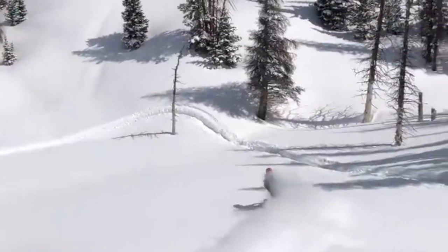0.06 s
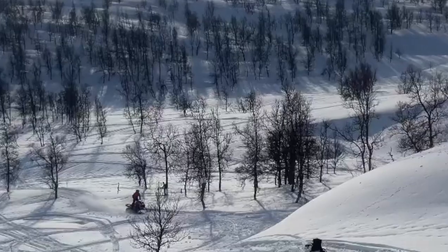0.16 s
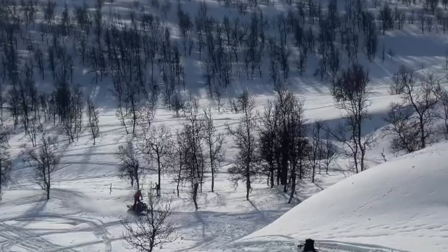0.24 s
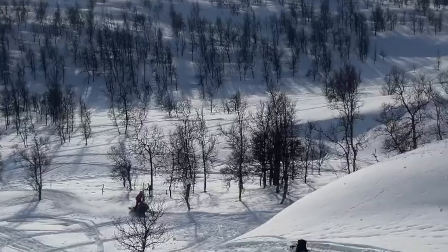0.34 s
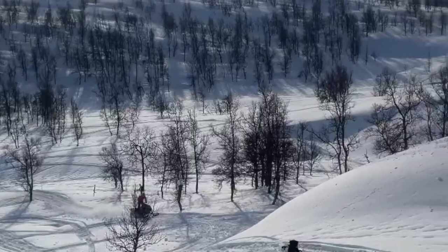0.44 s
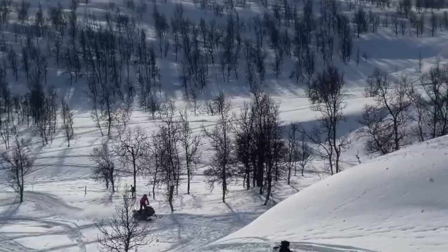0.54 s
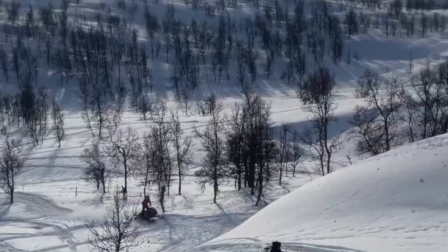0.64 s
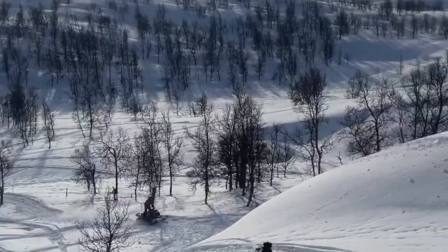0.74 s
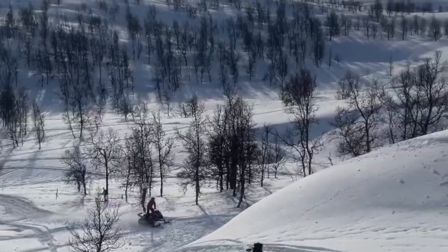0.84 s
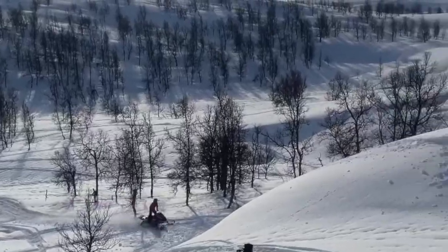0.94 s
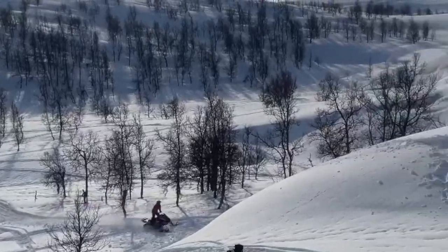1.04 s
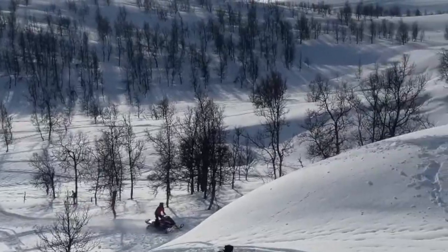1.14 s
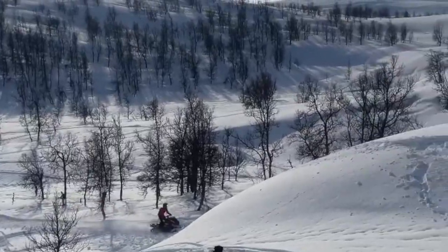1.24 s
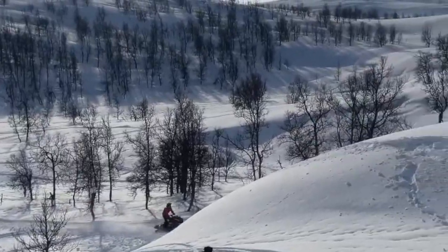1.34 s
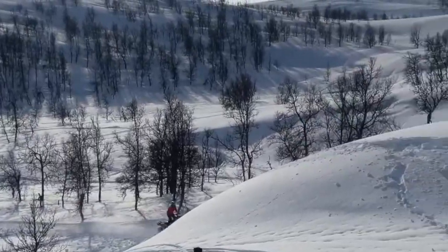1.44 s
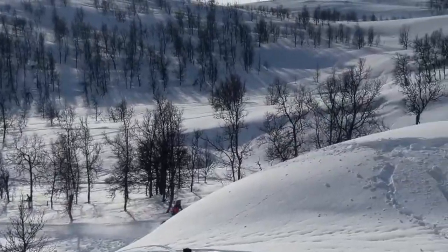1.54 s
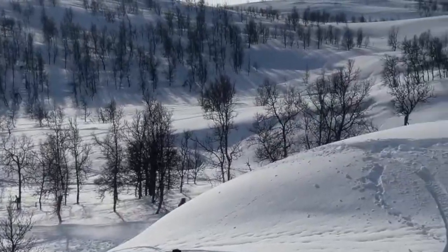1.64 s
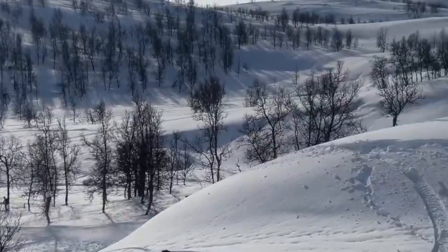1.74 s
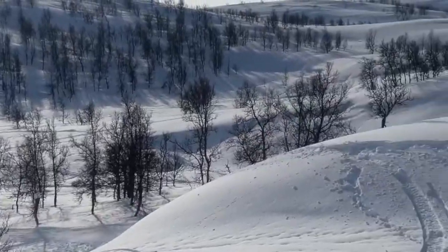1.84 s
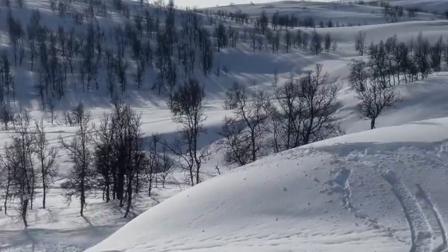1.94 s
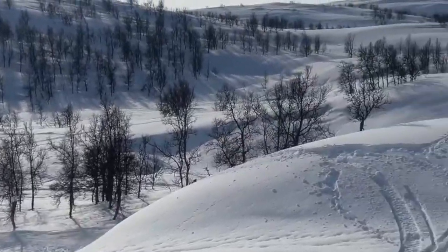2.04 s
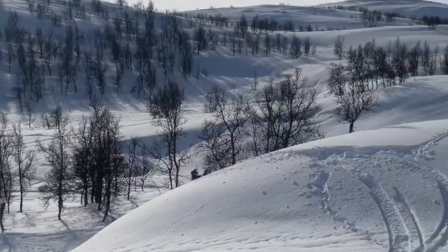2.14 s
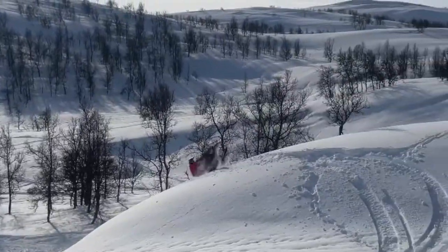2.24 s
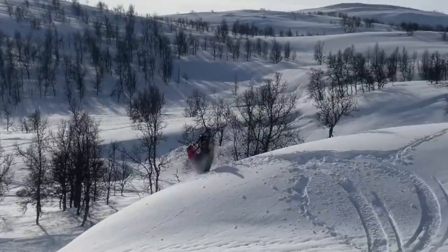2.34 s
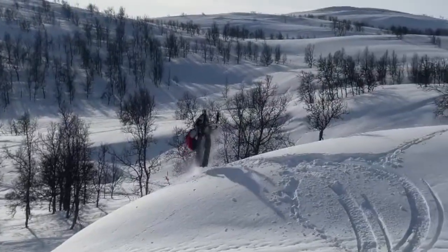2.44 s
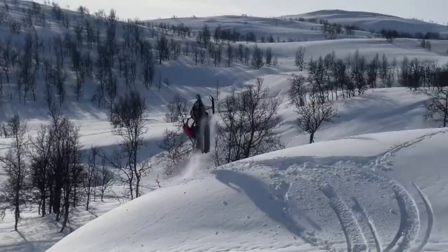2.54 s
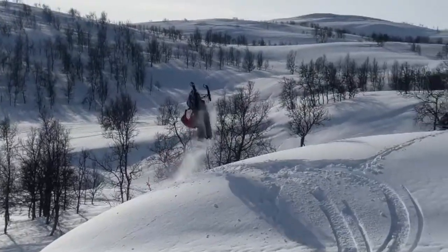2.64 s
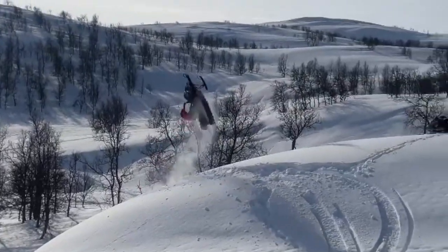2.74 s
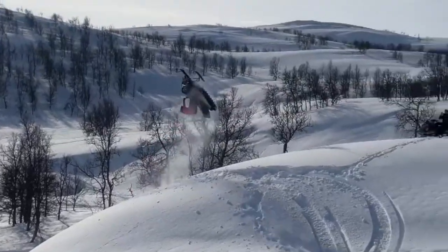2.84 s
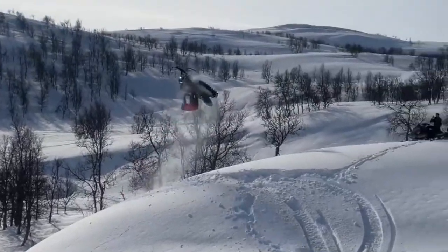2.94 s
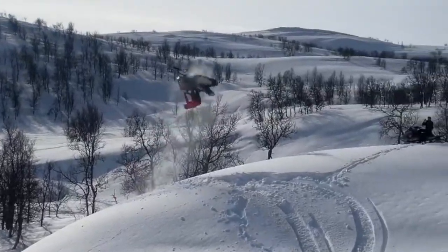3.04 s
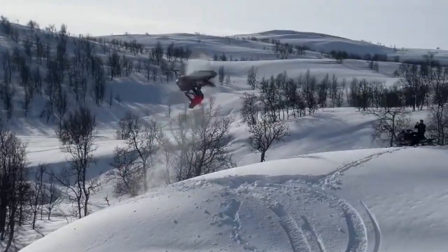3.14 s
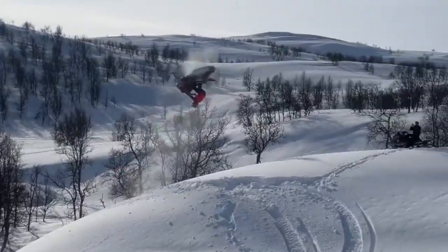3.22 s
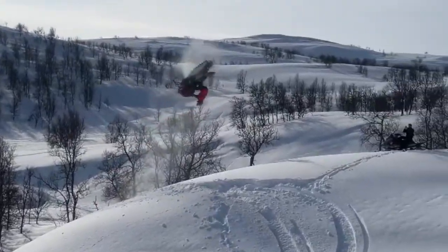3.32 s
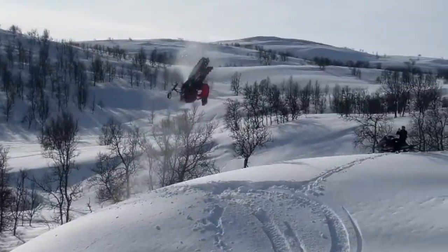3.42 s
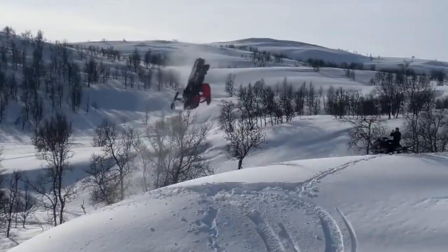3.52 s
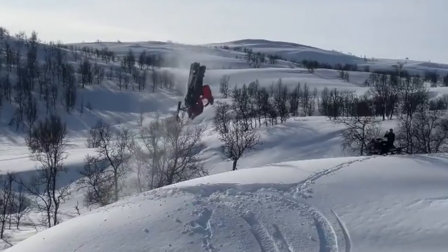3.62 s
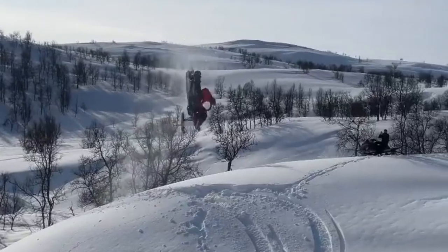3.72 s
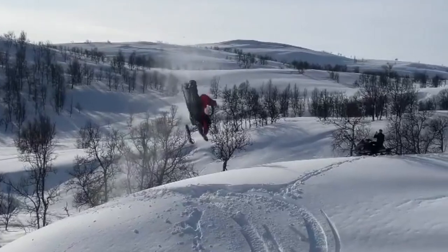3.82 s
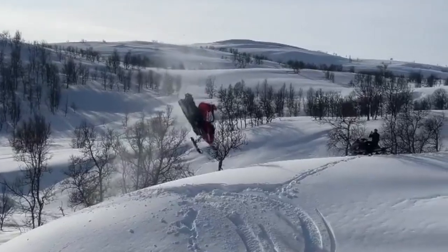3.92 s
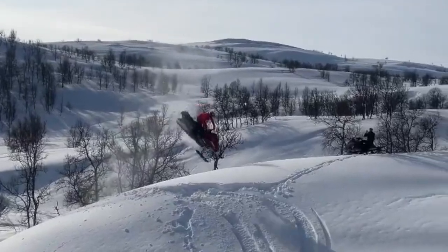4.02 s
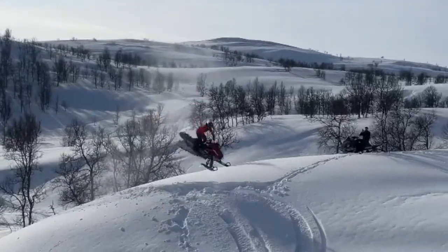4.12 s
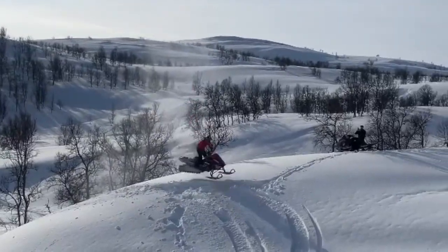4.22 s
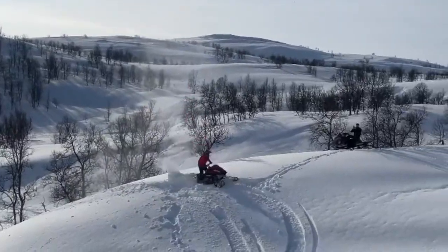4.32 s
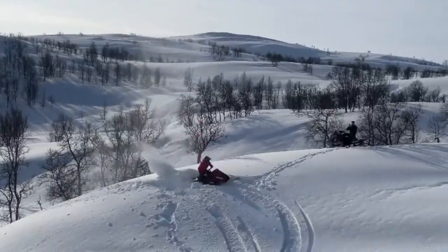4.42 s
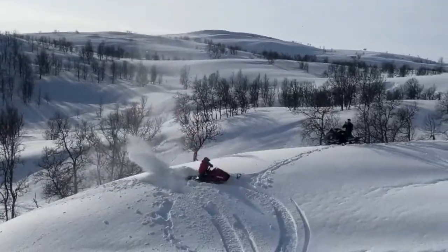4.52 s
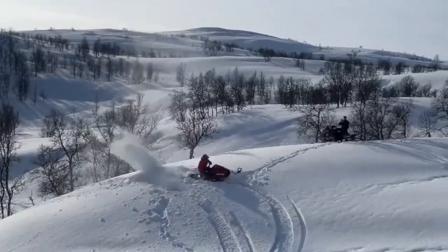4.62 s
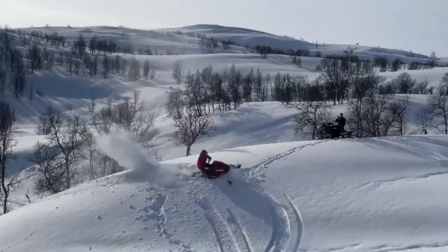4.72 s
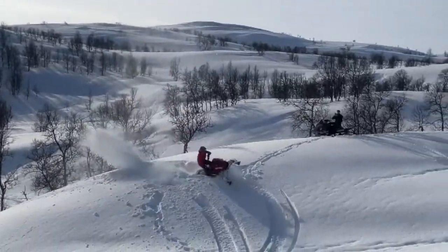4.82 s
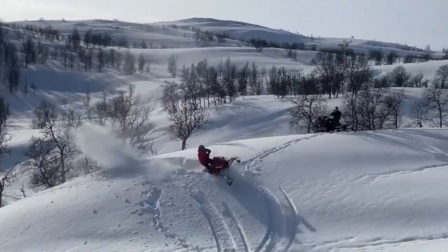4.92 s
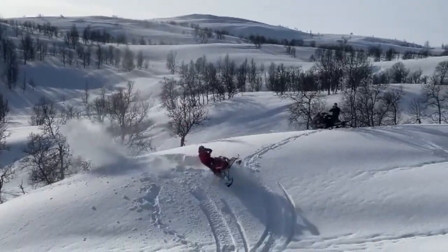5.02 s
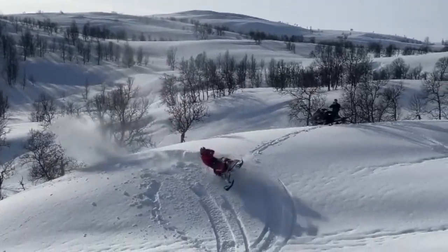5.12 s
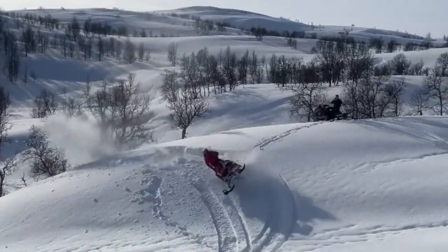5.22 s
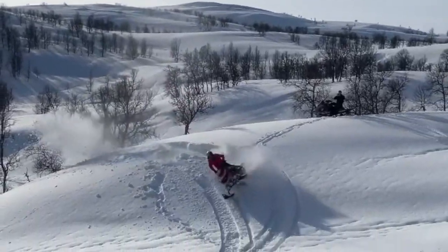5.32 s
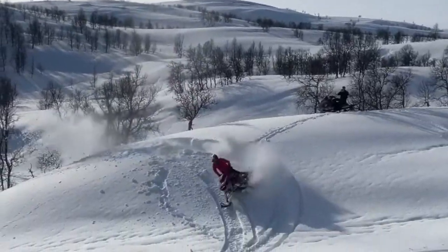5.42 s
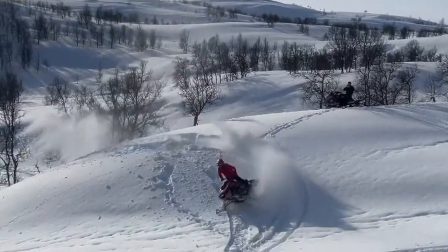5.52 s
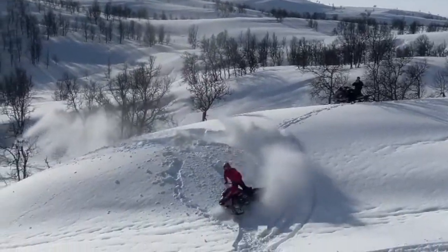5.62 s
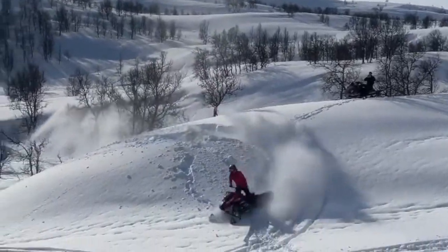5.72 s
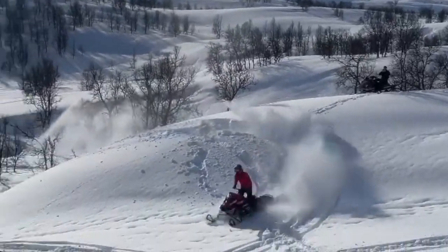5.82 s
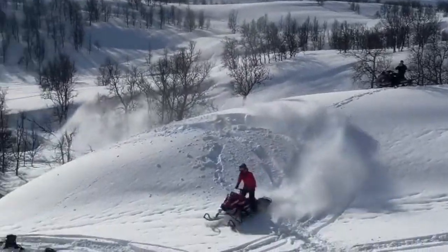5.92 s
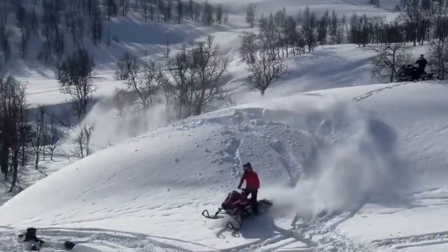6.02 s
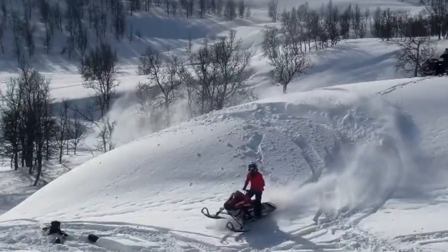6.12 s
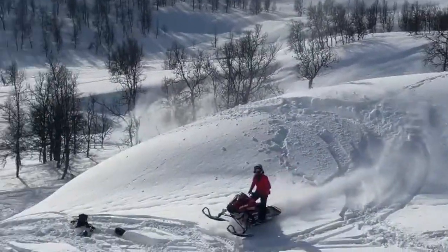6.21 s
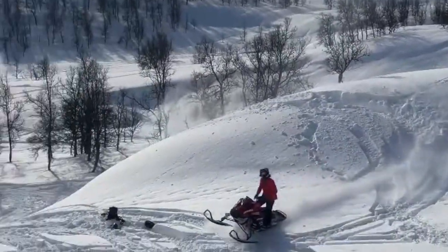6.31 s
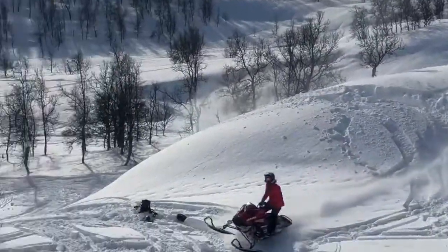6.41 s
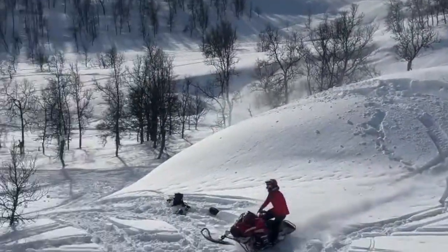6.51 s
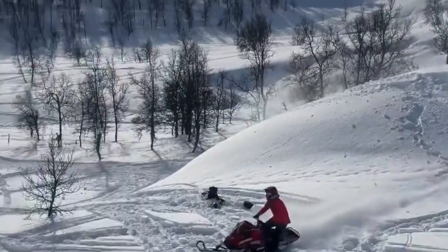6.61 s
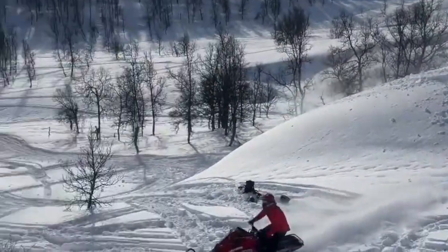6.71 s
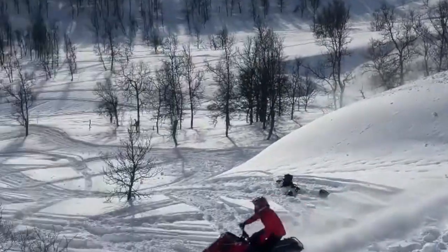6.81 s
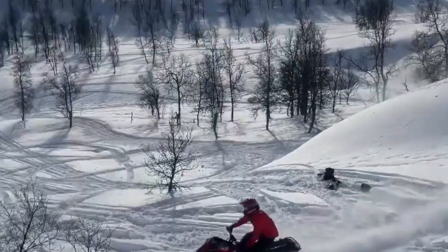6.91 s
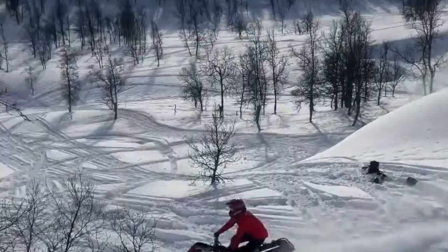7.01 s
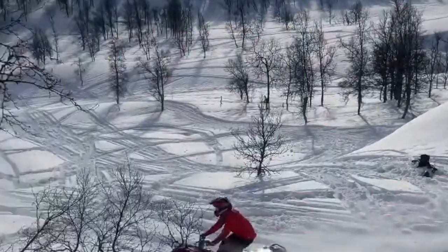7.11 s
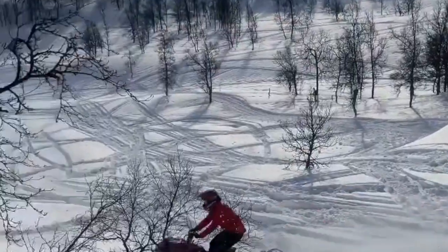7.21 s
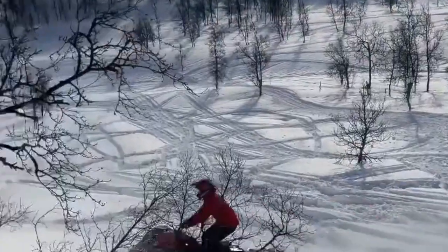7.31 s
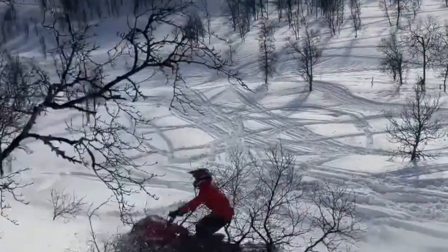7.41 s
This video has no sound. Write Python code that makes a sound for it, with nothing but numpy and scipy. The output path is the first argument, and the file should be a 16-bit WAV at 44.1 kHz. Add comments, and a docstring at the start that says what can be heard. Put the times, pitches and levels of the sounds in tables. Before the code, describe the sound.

A distant snowmobile blips its throttle, revs hard over a jump, lands in snow and rides past close by, its buzzing pitch finally sinking.

```python
"""A snow hill among wooded slopes, heard from one stereo microphone in light wind.
A two-stroke snowmobile blips its throttle far off, climbs, flips through the air, lands and rides past
close by. Firings sound the tuned pipe, gas rasps with them, and the rubber track whirs at its own speed
and throws snow. A split second of another sled, close up, and a short silence come first."""
import sys
import numpy as np
from scipy import signal
from scipy.fft import rfft, irfft, next_fast_len
from scipy.io import wavfile
from scipy.ndimage import uniform_filter1d

SR = 44100
rng = np.random.default_rng(int(sys.argv[2]) if len(sys.argv) > 2 else 0)


def file_out(sig):
    """Save sig as 16-bit WAV at sys.argv[1]."""
    # one column per channel
    cols = np.atleast_2d(sig).T
    # limit, then scale
    lim = np.clip(cols, -1, 1)
    pcm = np.round(lim * 32767).astype(np.int16)
    wavfile.write(sys.argv[1], SR, pcm)


N = 328913
T = np.arange(N) / SR
START_S = .154  # the distant sled comes in
FADING_DB, JITTER_TURNS = 2.6, .007  # random fading of each overtone; unevenness of the firings

# The pipe blares as it comes into tune and just before the throttle is cut.
# Each row: centre and half width in seconds, extra bark in dB, extra gas noise in dB.
SURGES = [(.36, 0.069, 3, -2), (1.34, 0.045, 2, 1), (2.36, 0.042, 1.5, -1.5), (2.785, 0.031, 5, 0),
          (5.99, 0.087, 1.5, -2.5), (6.562, 0.03, 6, -1.5)]

def engine(clean_rasp_db=-5, rough_rasp_db=3):
    """Pipe, intake and exhaust; returns their sound, the running count of firings and the bark's level."""
    hz = revs()
    drone_db, octave_db, bark_db, snarl_db = (loudness(voice, hz) for voice in VOICES)
    detuned = collapse()
    octave_db = octave_db - 16 * detuned
    bark_db = bark_db - 5.5 * detuned
    rasp_db = clean_rasp_db + roughness(hz, throttle()[0]) * (rough_rasp_db - clean_rasp_db)
    rasp_db = rasp_db + np.dot((-5.5, -1.5, -3, 0), sides()) + 7 * detuned
    flutter = .11 + .17 * roughness(hz, 1)  # steadier at high revs, even with the throttle shut
    turns = np.cumsum(hz * (1 + .002796 * walk(35))) / SR
    turns = turns + .017 * flutter * per_firing(turns)  # each firing comes a little early or late
    throb_db = np.dot((1.2, 2.2, .54, .89), sides()) * walk(22)  # deepest while the sled tumbles
    burble_db = 1.9 * airborne() * walk(34)  # in the air the bark and octave waver at random
    surge_db, surge_rasp_db = bumps(SURGES)
    sled = drone(turns, drone_db + throb_db, octave_db + burble_db, flutter) + intake(turns)
    sled = sled + exhaust(turns, hz, bark_db + surge_db + burble_db, snarl_db, rasp_db + surge_rasp_db)
    return sled, turns, bark_db

# Throttle blips, far off and in mid-air. Each row: times of opening, top speed and shutting in seconds,
# top firing rate in Hz, push in dB.
BLIPS = [(0.21, 0.358, 0.42, 261.2, -2), (.635, 0.71, 0.77, 225.7, -3), (0.849, 1.039, 1.125, 233.1, -2),
         (1.18, 1.334, 1.35, 228, -1.5), (1.508, 1.663, 1.69, 239.3, -2), (1.829, 2.131, 2.24, 253.2, 0),
         (3.628, 3.95, 4.07, 265.1, -3.5)]
# Long pulls: uphill, through the flip, into the landing, round the turn, past the microphone.
# Each row: times of opening and shutting in seconds, push in dB.
PULLS = [(2.098, 2.811, -0.5), (2.801, 3.503, -0.5), (4.13, 4.374, -0.5), (4.55, 5.651, 1.7),
         (5.835, 6.574, 2.5)]
SNAP_S = .007  # a long pull ends this abruptly

def throttle(open_s=.12, ease_s=.017):
    """How far the throttle is open (0-1), and its push in dB; blips ease off, long pulls snap shut."""
    opening, push_db = 0, 0
    blips = [(opens, shuts, db, ease_s) for opens, _, shuts, _, db in BLIPS]
    pulls = [(*pull, SNAP_S) for pull in PULLS]
    for opens, shuts, db, closing_s in blips + pulls:
        gate = np.clip((T - opens) / open_s, 0, 1) * np.clip(1 - (T - shuts) / closing_s, 0, 1)
        opening, push_db = opening + gate, push_db + db * gate
    return np.minimum(opening, 1), push_db

# Up the hill and into the flip. Each row: time in seconds, firing rate in Hz.
CLIMB = [(2.23, 259.5), (2.33, 259.1), (2.422, 279), (2.515, 284.3), (2.78, 274.7), (2.89, 249.3),
         (2.99, 251.6), (3.14, 249), (3.42, 268.2), (3.49, 271.1)]
# From the landing to coasting past the microphone. Each row: time in seconds, firing rate in Hz.
RIDE_BACK = [(4.12, 248.4), (4.189, 236.8), (4.341, 248.6), (4.4, 214.2), (4.459, 195.2), (4.53, 206.2),
             (4.72, 256.3), (4.85, 280.5), (5.35, 281.3), (5.62, 269.4), (5.79, 265.5), (6.12, 286.5),
             (6.56, 282.8), (6.67, 235.7), (6.72, 207.9), (6.751, 203.1), (7.11, 176), (7.409, 135.4),
             (7.45, 135.7)]

def revs(start_hz=222, fall_hz_per_s=205):
    """Firing rate in Hz: it sinks ahead of each blip, winds up again, and follows the long pulls."""
    points = [(START_S, start_hz), *map(tuple, CLIMB), *map(tuple, RIDE_BACK)]
    for opens, reached, shuts, top_hz, _ in BLIPS:
        last_s, last_hz = max(p for p in points if p[0] < opens)
        low_hz = last_hz - fall_hz_per_s * (opens - last_s)
        points += [(opens, low_hz), (reached, top_hz), (shuts, top_hz)]
    return uniform_filter1d(curves(sorted(points))[0], size=1300)  # the flywheel rounds the corners

def roughness(hz, opening, off_pipe_hz=221, on_pipe_hz=283):
    """0 with the throttle open and the pipe in tune, 1 with it shut or at low revs; rougher in the air."""
    in_tune = np.clip((hz - off_pipe_hz) / (on_pipe_hz - off_pipe_hz), 0, 1)
    return np.minimum(1 - opening * in_tune + .1 * airborne(), 1)

def airborne(from_s=2.82, to_s=4.7):
    """1 from take-off until just after the landing, while the engine spins without load."""
    return uniform_filter1d(((T > from_s) & (T < to_s)) * 1., size=2200)

def collapse(recovery_s=.33):
    """0-1: when the last pull is cut, the pipe drops out of tune at once and recovers slowly."""
    age = np.maximum(T - PULLS[-1][1], 0)
    return np.minimum(age / SNAP_S, 1) * np.exp(-age / recovery_s)

# The pipe's low tones swell and fade apart from the rest.
# Each row: centre and half width in seconds, gain of the drone in dB, gain of its octave in dB.
SWELLS = [(.37, 0.12, 0.5, 2), (.52, 0.058, 4.5, 11), (2.421, 0.071, 4, 2), (2.55, 0.037, -8, -7.5),
          (2.66, 0.047, -2.5, 3.5), (3.151, 0.035, 6, 2), (3.4, 0.14, 2.5, -8), (3.57, 0.053, -9, -0.5),
          (4.09, 0.062, -10, -12.5), (4.26, 0.099, 7, 4.5), (4.41, 0.041, 2, -15),
          (4.661, 0.19, -7.5, -6.5), (5.26, 0.073, 1, -6.5), (5.74, 0.18, 3.5, -5.5),
          (6.38, 0.16, -7.5, 1.5), (6.61, 0.048, 11, -4), (6.71, .035, 5, -1), (6.98, .2, -5, 5.5)]

def drone(turns, drone_db, octave_db, flutter):
    """The tuned pipe's two lowest tones; uneven firings make them flutter."""
    swell_db, octave_swell_db = bumps(SWELLS)
    low = undb(drone_db + swell_db) * np.cos(2 * np.pi * turns) * (1 + flutter * walk(70))
    octave = undb(octave_db + octave_swell_db) * np.sin(4 * np.pi * turns)
    return np.sqrt(2) * (low + octave * (1 + .82 * flutter * walk(70)))

# Exhaust gas noise. Each row: frequency in Hz, relative level in dB.
RASP = [(40, -50.5), (85, -38), (130, -22), (220, 6.5), (330, -0.5), (450, 0), (700, 0.5), (1000, 1.5),
        (1250, -3.5), (1600, 0.5), (2000, -4.5), (2250, -3.5), (2750, -16.5), (3080, -15), (4500, -23.5)]

def exhaust(turns, hz, bark_db, snarl_db, rasp_db):
    """Overtones and rasping gas leave the pipe as a low body, a bark in the middle and a snarl on top."""
    pipe = overtones(turns, hz) + undb(rasp_db) * gas(turns, RASP, depth=.076, flicker_db=1.27)
    snarl = highpass(pipe, 1900, order=6)
    body = pipe - highpass(pipe, 600, order=4)
    bark = pipe - snarl - body
    body = undb(2) * body / np.sqrt(1 + undb(2 * rasp_db))
    return undb(bark_db - 1) * (steady(bark) + body) + undb(snarl_db - 1.5) * steady(snarl)

# The exhaust from the microphone's spot: far off, side-on in the jump, coming downhill, passing close.
# Each row: frequency in Hz, relative level in dB.
BARK_FAR = [(600, -6), (790, -4.5), (920, -2), (1120, -8), (1300, -8.5), (1580, -11.5), (2000, -9.5),
            (2250, -11.5), (2500, -14.5), (2850, -25), (3400, -23), (4500, -68)]
BARK_JUMP = [(600, -1), (800, 3.5), (1080, -1), (1380, -8.5), (1700, -8.5), (1980, -10.5), (2260, -5),
             (2530, -16.5), (2790, -9), (3100, -21.5), (3400, -37), (4500, -39), (6000, -42)]
BARK_RETURN = [(600, -1), (830, 5), (1120, 3.5), (1400, -0.5), (1680, -5.5), (1960, -5.5), (2250, -8),
               (2530, -11), (2800, -19.5), (3100, -16.5), (3400, -25.5), (3700, -19.5), (5400, -40.5)]
BARK_PASS = [(600, -1), (850, 9.5), (1140, 1), (1420, 4), (1710, 2), (2000, -5.5), (2280, -2.5),
             (2560, -4.5), (2850, -8.5), (3140, -10.5), (3400, -24), (4280, -21.5), (5700, -32)]
# Single overtones stand out or sink as the sled turns.
# Each row: start and end in seconds, multiple of the firing rate, gain in dB.
RINGS = [(1.26, 1.42, 3, -4), (1.28, 1.4, 11, 7), (2.38, 2.55, 9, 5), (2.3, 2.56, 10, -4),
         (2.58, 2.82, 10, 7), (2.34, 2.6, 8, 4), (2.64, 2.86, 8, -7), (2.95, 3.52, 4, 4),
         (3.28, 3.52, 3, -4), (3.28, 3.52, 5, 7), (3.28, 3.52, 6, 3), (3.28, 3.52, 11, -6),
         (3.28, 3.52, 9, -3), (3.77, 4.0, 11, 7), (4.18, 4.33, 10, 6), (4.2, 4.38, 9, 5),
         (4.56, 4.71, 4, 6), (4.85, 5.15, 9, 9), (4.86, 5.16, 7, 3), (5.17, 5.43, 8, 9), (5.15, 5.47, 9, 7),
         (5.8, 6.02, 11, -6), (6.03, 6.45, 9, 6), (6.1, 6.35, 11, 3), (6.5, 6.62, 4, 7)]

def overtones(turns, hz, flicker_db=1.47):
    """Tones of the exhaust pulses; unequal cylinders add half orders, snow reflections make each fade."""
    shares, spectra = sides(), (BARK_FAR, BARK_JUMP, BARK_RETURN, BARK_PASS)
    imbalance_db = np.dot((-7.5, -16, -11.5, -11.5), shares)
    turns = turns + JITTER_TURNS * walk(90)  # uneven running smears the highest tones most
    tones = 0
    for order in np.r_[2.5:12:.5, 12:21]:
        db = sum(share * at(spectrum, order * hz) for share, spectrum in zip(shares, spectra))
        ring_db = sum(gain * during(start, end) for start, end, k, gain in RINGS if k == order)
        db = db + (order % 1 > 0) * imbalance_db + ring_db + FADING_DB * walk(16)
        tones = tones + undb(db) * np.cos(2 * np.pi * (order * turns + rng.random()))
    return steady(tones) * undb(flicker_db * per_firing(turns))

# The airbox's growl. Each row: frequency in Hz, relative level in dB.
GROWL = [(40, -43.5), (88, -32), (124, -0.5), (150, -2.5), (200, 0.5), (350, -5.5), (600, -7.5),
         (2000, -49)]
# Its strength along the ride. Each row: time in seconds, level in dB.
LOAD = [(.15, -54), (.42, -56), (.5, -35.5), (.62, -44), (1.9, -49), (2.25, -45), (2.5, -35.5), (2.85, -22),
        (3.1, -31.5), (4.25, -29.5), (4.55, -52), (5.2, -35), (6.45, -42), (6.7, -31.5), (6.85, -36.5),
        (7.45, -47.5)]

def intake(turns):
    """The airbox gulps once every two firings and growls under load."""
    return gas(turns / 2, GROWL, depth=1, flicker_db=.5) * undb(curves(LOAD)[0])

# How the sled faces the microphone.
# Each row: time in seconds, side (0 far off, 1 side-on in the jump, 2 coming downhill, 3 passing close).
FACING = [(1.8, 0), (2.3, 1), (4.4, 1), (4.7, 2), (5.6, 2), (5.95, 3)]

def sides():
    """Shares of the four sides the sled shows; they blend settings listed as far, jump, return, pass."""
    facing = curves(FACING)[0]
    return np.array([np.maximum(1 - abs(facing - k), 0) for k in range(4)])

# Distance from the microphone and the lie of the land. Each row: time in seconds, gain in dB.
NEARNESS = [(.15, -9.5), (1.4, -11), (2.3, 4.5), (2.5, 3.9), (3.4, 3), (4.3, 0.7), (4.5, -4), (5.5, 7),
            (6.1, 0.17), (7.45, 1)]
# Drone, octave, bark and snarl. Each row, in dB: base level far off, in the jump, returning and passing,
# then the change with the throttle shut, behind the hill, and per octave of revs.
VOICES = {"drone": (-19.5, -19.5, -24, -25, -4, -16, 14),
          "octave": (-25.5, -23, -26, -21.5, -9.5, -27.5, 10),
          "bark": (-19.5, -24, -30, -26.5, -5.5, -28.5, 6),
          "snarl": (-28, -31.5, -34.5, -29.5, -8.5, -27, 7)}

def loudness(voice, hz):
    """Level of one engine voice in dB, from distance, side shown, throttle, hill and revs."""
    *side_db, shut_db, hidden_db, per_octave_db = VOICES[voice]
    opening, push_db = throttle()
    behind_hill = np.interp(T, (1.416, 1.96, 2.16, 2.347), (0, 1, 1, 0))
    effort_db = push_db + shut_db * (1 - opening) + per_octave_db * np.log2(hz / 270)
    return curves(NEARNESS)[0] + np.dot(side_db, sides()) + hidden_db * behind_hill + effort_db

# The rubber track along the ride. Each row: time in seconds, lug rate in Hz, level in dB.
TRACK = [(.15, 238, -45.5), (1.4, 205, -47.5), (2.3, 139.1, -49), (2.55, 139.3, -25), (2.66, 171, -27.5),
         (2.8, 216.4, -26.5), (3, 236.4, -25), (3.3, 245.3, -42), (3.9, 230.5, -32.5), (4.35, 213.7, -42),
         (4.52, 146.5, -38), (5, 244.2, -24.5), (5.35, 275.3, -30.5), (5.8, 205.4, -28.5), (6.48, 262, -21),
         (6.75, 205.4, -31.5), (7, 184.3, -38.5), (7.45, 142.2, -43)]
# Its whir. Each row: multiple of the lug rate, relative level in dB.
TRACK_TONES = [(.5, -3), (1, -1), (1.5, -39), (2, -19.5), (3, -21), (4, -18)]

def track(wobble=.0057, rattle_db=3.5):
    """Lugs beat over the drive wheels; every other one is staggered, which adds half orders."""
    hz, db = curves(TRACK)
    turns = np.cumsum(hz * (1 + wobble * walk(40))) / SR
    whir = fading_tones(turns, TRACK_TONES, rattle_db, rate=25)
    return highpass(whir, 108, order=6) * undb(db)  # the tunnel is too small to radiate deep tones

# Hiss of track and spraying snow. Each row: frequency in Hz, relative level in dB.
HISS = [(1500, -11), (2700, 9.5), (3100, -11), (3500, 3), (3800, 3.5), (4200, 3.5), (5200, 5), (6200, 6.5),
        (8500, -8.5), (10000, -5.5)]
# Its rise and fall at the microphone. Each row: time in seconds, relative level in dB.
HISS_LEVEL = [(0.16, -64), (0.32, -58), (0.85, -63.5), (1.31, -55), (1.94, -80), (2.13, -78), (2.33, -42),
              (2.41, -50), (3.39, -39.5), (3.61, -47), (3.79, -42), (4.14, -45), (4.3, -40), (4.48, -58.5),
              (5.05, -50), (6.53, -50.5), (6.66, -59.5), (7.45, -60)]

def snow_spray(turns, gain_db):
    """The track throws snow in a hiss that pulses lightly with the firings."""
    return undb(curves(HISS_LEVEL)[0] + gain_db) * gas(turns, HISS, depth=.12, flicker_db=1.26)

# Touchdown: tail, skis, then settling. Each row: start in seconds, crunch level in dB,
# crunch decay in seconds, thump frequency in Hz, thump level in dB.
LANDING = [(4.332, -20, 0.04, 115, -16.5), (4.378, -31, 0.02, 150, -23), (4.455, -42, 0.027, 85, -27)]
# The crunch of soft snow. Each row: frequency in Hz, relative level in dB.
CRUNCH = [(25, -4), (50, -4), (130, -4.5), (300, 1), (800, -22), (2000, -13), (6000, -35.5)]

def landing(attack_s=.011, thump_decay_s=.013):
    """The sled crunches into soft snow; each blow also thumps the chassis."""
    crunch, thumps = 0, 0
    for start, snow_db, decay_s, hz, thump_db in LANDING:
        age = np.maximum(T - start, 0)
        attack = np.minimum(age / attack_s, 1)
        crunch += undb(snow_db) * attack * np.exp(-age / decay_s)
        thumps += undb(thump_db) * attack * np.exp(-age / thump_decay_s) * np.sin(2 * np.pi * hz * age)
    return crunch * colour(rng.standard_normal(N), CRUNCH) + np.sqrt(2) * thumps

# The drive belt, close by. Each row: multiple of the firing rate, relative level in dB.
BELT_TONES = [(3, -10), (5, 0), (7, -8), (8, -7), (9, -8), (11, -5), (12, -7)]

def drive_whine(turns, coast_s=6.64, swell_s=.22, chain_hz=2220, fall_hz_per_s=180):
    """As the sled coasts, the chain case whirs in a narrow band and the belt briefly sings; both sink."""
    coasted = np.maximum(T - coast_s, 0)
    rattle = walk(80) + 1j * walk(80)
    chain_turns = np.cumsum(chain_hz - fall_hz_per_s * coasted) / SR
    chain = unit(np.real(rattle * np.exp(2j * np.pi * chain_turns))) * np.minimum(coasted / swell_s, 1)
    slipping = turns + JITTER_TURNS * walk(90)
    belt = fading_tones(slipping, BELT_TONES, FADING_DB, rate=15) * during(6.79, 7.12)
    return undb(-42) * chain + undb(-35 - 6 * coasted) * belt

def close_sled(firing_hz=214, boom_hz=125, end_s=.027):
    """An instant of another sled at the microphone: each firing cracks and puffs gas, over a low boom."""
    phase = (T - .0015) * firing_hz % 1
    pulses = unit(np.diff(phase, prepend=phase[0]))
    puffs = unit(rng.standard_normal(N) * np.exp(-phase))
    spectrum = [(200, 3), (600, 6), (1200, 1), (2000, 5), (3000, 2), (3800, -9), (5500, -3.5),
                (8500, -15)]
    cracks = colour(pulses + undb(-5) * puffs, spectrum)
    boom = np.sqrt(2) * np.sin(2 * np.pi * boom_hz * T)
    return (undb(-27) * cracks + undb(-22) * boom) * np.exp(-np.maximum(T - end_s, 0) / .0023)

# Echoes off the wooded slope. Each row: delay in seconds, level against the direct sound in dB.
ECHOES = [(.019, -10), (.043, -12), (.09, -17)]

def slope_echoes(sled):
    """While the sled is far off, echoes overlap its gliding tones and make them beat."""
    far = sides()[0]
    echoes = sum(undb(db) * np.interp(T - delay, T, sled, left=0) for delay, db in ECHOES)
    power = sum(undb(db) ** 2 for _, db in ECHOES)
    return (sled + far * echoes) / np.sqrt(1 + far ** 2 * power)

# Engine noise off the surrounding slopes. Each row: frequency in Hz, relative level in dB.
SCATTER = [(40, -43.5), (200, -18), (700, 2), (1500, -4), (2300, 1.5), (3100, 4.5), (5000, -50.5)]

def slope_scatter(turns, bark_db):
    """The slopes scatter hiss and engine noise from all sides; opposite signs in left and right."""
    hiss = snow_spray(turns, gain_db=-7)
    wash = undb(bark_db - 16) * colour(rng.standard_normal(N), SCATTER)
    return (hiss + wash) * np.array([[1], [-1]])

# Air on the microphone. Each row: frequency in Hz, relative level in dB.
WIND = [(20, -14), (40, -3.5), (70, 9), (110, 9.5), (200, -4), (500, -58)]
# It rises as the microphone swings round. Each row: time in seconds, level in dB.
GUSTS = [(.15, -62), (1.4, -54), (3.5, -49.5), (4.3, -49), (5.5, -46), (7.45, -40.5)]

def wind():
    """Light air rumbles on the microphone."""
    return colour(rng.standard_normal(N), WIND) * undb(curves(GUSTS)[0] + 2 * walk(14))

def gas(turns, spectrum, depth, flicker_db):
    """Turbulent noise that puffs once a turn."""
    puff = 1 + depth * np.cos(2 * np.pi * turns)
    return colour(rng.standard_normal(N) * puff * undb(flicker_db * per_firing(turns)), spectrum)

def fading_tones(turns, tones, fading_db, rate):
    """Tones from rows of (multiple, dB), each fading at random; rms 1."""
    return unit(sum(undb(db + fading_db * walk(rate)) * np.sin(2 * np.pi * (k * turns + rng.random()))
                    for k, db in tones))

def walk(rate):
    """Smooth chance with spread near 1 that changes rate times a second."""
    steps = rng.standard_normal(8000)
    joined = np.interp(T * rate, np.arange(len(steps)), steps)
    return 1.41 * uniform_filter1d(joined, max(1, int(SR / rate / 2)))

def per_firing(turns):
    """A fresh random value for each firing, joined smoothly."""
    values = rng.standard_normal(4000)
    return 1.12 * np.interp(turns, np.arange(len(values)), values)

def curves(table):
    """Each column of a table, joined by straight lines in time."""
    times, *columns = np.transpose(table)
    return [np.interp(T, times, column) for column in columns]

def bumps(table):
    """Bell-shaped rises and dips: one curve for each dB column."""
    return sum(np.outer(db, np.exp(-((T - centre) / width) ** 2)) for centre, width, *db in table)

def during(start, end, fade_s=.09):
    """1 between two times, with soft edges."""
    return np.clip(np.minimum(T - start, end - T) / fade_s + .5, 0, 1)

def at(points, hz):
    """Read (Hz, value) points on a log-frequency axis."""
    f, value = np.transpose(points)
    return np.interp(np.log(hz + 1), np.log(f + 1), value)

def colour(x, points):
    """Filter a sound through (Hz, dB) points; rms 1."""
    size = next_fast_len(N)
    gain = undb(at(points, np.arange(size // 2 + 1) * SR / size))
    return unit(irfft(rfft(x, size) * gain, size)[:N])

def highpass(x, hz, order):
    """Keep what lies above hz, without delay."""
    return signal.sosfiltfilt(signal.butter(order, hz, "high", fs=SR, output="sos"), x)

def steady(x, hold_s=.17):
    """Hold a sound at rms 1 from moment to moment."""
    return x / np.sqrt(uniform_filter1d(x ** 2, int(hold_s * SR)) + 1e-12)

def unit(x):
    """Scale to rms 1."""
    return x / np.sqrt(np.mean(x ** 2))

def undb(db):
    """Decibels to gain."""
    return 10 ** (np.asarray(db) / 20)

def scene():
    """The close sled, a gap, then the whole ride, as they reach the microphone."""
    sled, turns, bark_db = engine()
    ride = slope_echoes(sled) + snow_spray(turns, gain_db=9) + slope_scatter(turns, bark_db)
    ride = ride + track() + drive_whine(turns) + landing() + wind()
    return ride * (T > START_S) + close_sled()

# Shading between the microphone's two ports. Each row: frequency in Hz, left minus right in dB.
PORT_LEVEL = [(60, 3.5), (110, 1), (190, 2), (330, 5), (590, 3.5), (1050, 0.5), (1860, -2.0), (3300, -4.5),
              (5850, -1), (10400, -2)]
# Delay between them. Each row: frequency in Hz, lead of the left port in radians.
PORT_PHASE = [(100, 0), (500, -.3), (1100, -.8), (1550, -.2), (2000, -1.1), (3500, .4), (5300, .4),
              (7000, 3), (10000, 4.7)]

def record(dry, top_hz=9700):
    """The camera body shades and delays each microphone port differently; the top is cut."""
    size = next_fast_len(N + 4096)
    hz = np.arange(size // 2 + 1) * SR / size
    side = np.array([[1], [-1]]) / 2
    ports = undb(side * at(PORT_LEVEL, hz)) * np.exp(1j * (side - 1 / 2) * at(PORT_PHASE, hz))
    heard = irfft(rfft(dry, size) * ports, size)[:, :N]
    return signal.sosfilt(signal.ellip(8, .2, 70, top_hz, fs=SR, output="sos"), heard)

dry = scene()
out = record(dry)
file_out(out)
```